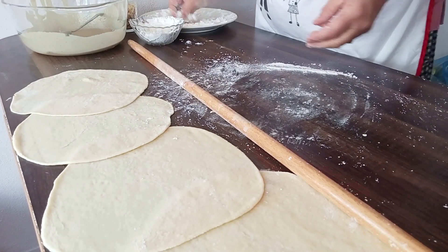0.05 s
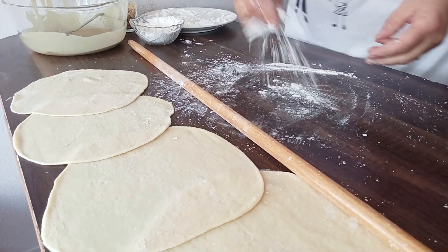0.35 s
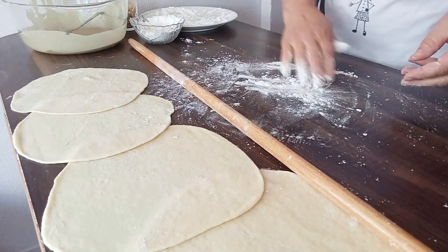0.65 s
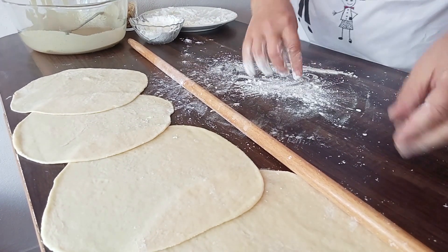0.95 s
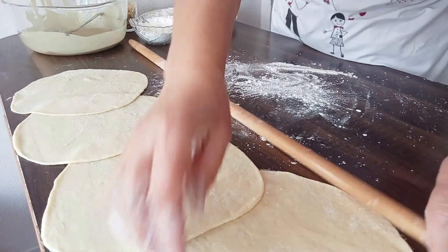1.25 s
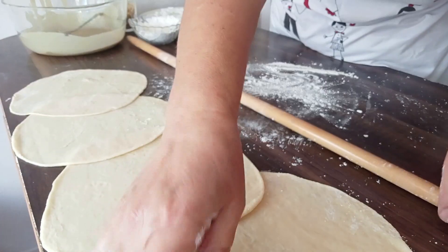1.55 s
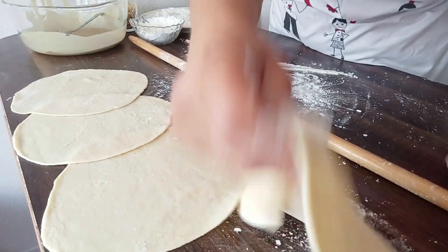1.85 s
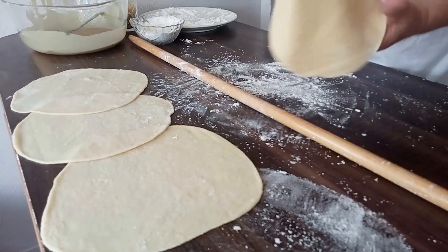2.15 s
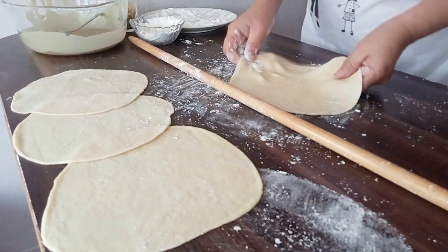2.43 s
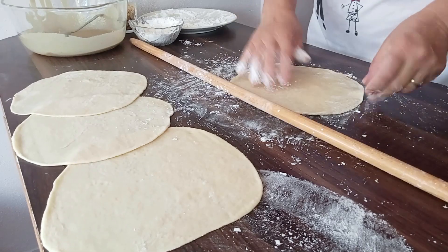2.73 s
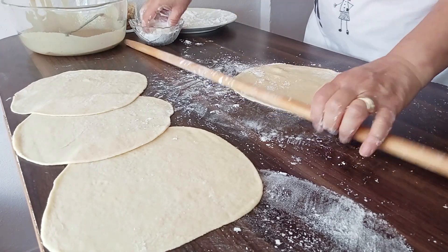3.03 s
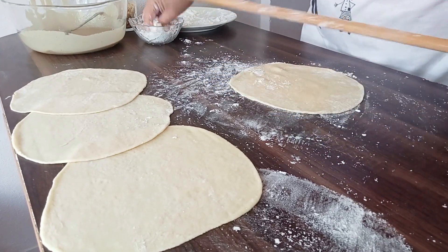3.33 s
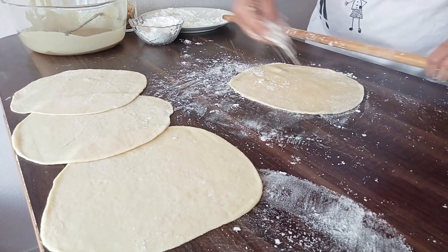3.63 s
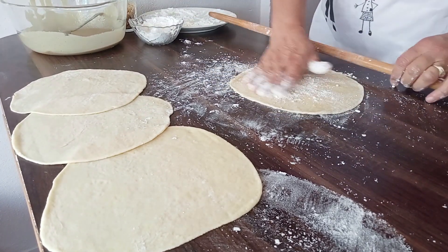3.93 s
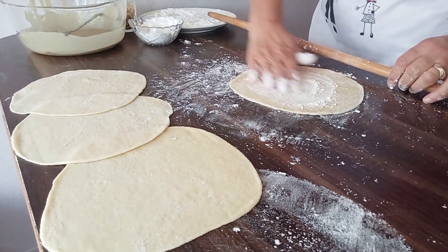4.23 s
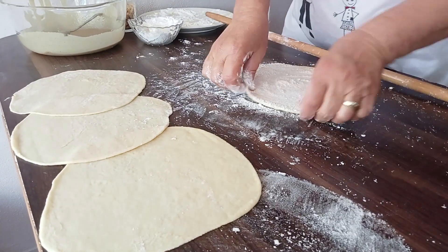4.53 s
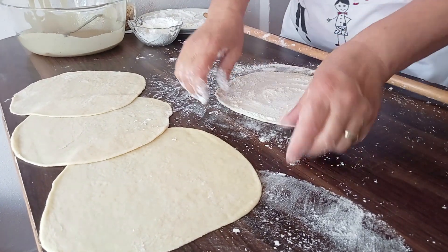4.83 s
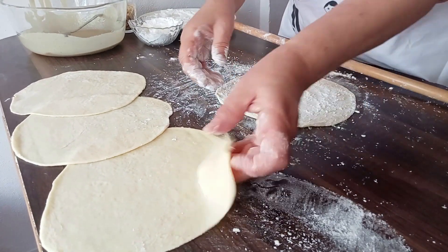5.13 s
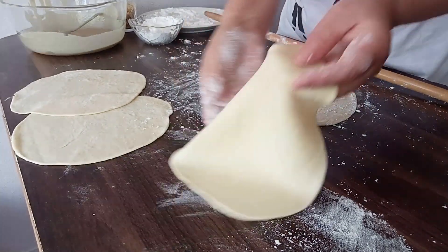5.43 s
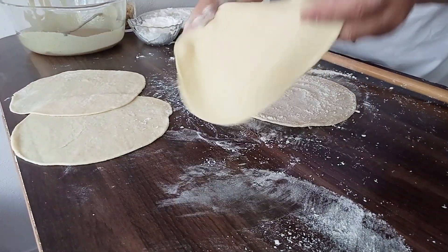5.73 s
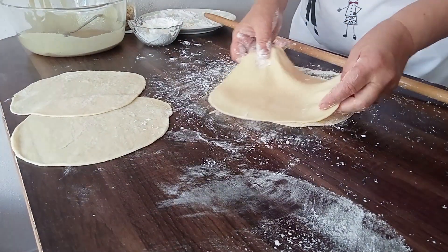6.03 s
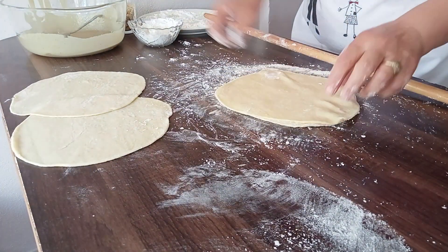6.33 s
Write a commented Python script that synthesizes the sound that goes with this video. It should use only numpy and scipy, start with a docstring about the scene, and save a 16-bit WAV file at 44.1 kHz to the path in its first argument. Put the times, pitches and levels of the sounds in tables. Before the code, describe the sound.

Flour-dusted hands rub and slap dough on a wooden table, and a rolling pin clacks against a glass bowl and a china plate.

```python
"""A small kitchen, close to a floured wooden table where dough is being worked. An appliance hums.
Flour hisses under a palm, dough sticks and slips over the wood, and fingers and slaps of dough
make the boards thud. A thin rolling pin is picked up, clacks on a glass mixing bowl, rolls,
strikes a china plate and is set down. Each hard knock makes the dish ring with its own notes."""
import sys
import numpy as np
from scipy import signal
from scipy.fft import rfft, irfft
from scipy.io import wavfile
from scipy.ndimage import uniform_filter1d

SR = 44100
rng = np.random.default_rng(int(sys.argv[2]) if len(sys.argv) > 2 else 0)


def to_wav(sig):
    """Store sig (one row per channel, or 1-D mono) as 16-bit WAV at the path in sys.argv[1].

    Samples outside -1..1 are clipped; the rate is SR.
    """
    pcm = np.clip(np.atleast_2d(sig), -1, 1) * 32767
    pcm = np.round(pcm).astype(np.int16)
    wavfile.write(sys.argv[1], SR, pcm.T)  # frames by channels


N = 285768
TIME = np.arange(N) / SR  # seconds into the scene
AGE = np.arange(SR // 2) / SR  # seconds since a knock


def undb(db):
    """Turn decibels into a number to multiply by."""
    return 10 ** (np.asarray(db) / 20)


def unit(x):
    """Scale a signal to an average strength (rms) of 1."""
    return x / np.sqrt(np.mean(x ** 2))


def attack(x, size=441):
    """Scale a knock to a strength of 1 over its first 10 ms."""
    return x / np.sqrt(np.mean(x[:size] ** 2))


def add(track, s, sound):
    """Mix a sound into the track, starting at s seconds."""
    start = int(s * SR)
    track[start:start + len(sound)] += sound[:N - start]


def only(x, part, hz, order):
    """Filter a sound down to its "low" part, its "high" part or a "band"."""
    return signal.sosfilt(signal.butter(order, hz, part, fs=SR, output="sos"), x)


def noise(spectrum, size=N):
    """Noise shaped by a table of (pitch [Hz], level [dB])."""
    hz, db = np.transpose(spectrum)
    bins = np.maximum(np.fft.rfftfreq(size, 1 / SR), 1)
    bass_cut = np.minimum(bins / hz[0], 1) ** 2
    shape = undb(np.interp(np.log(bins), np.log(hz), db))
    return unit(irfft(rfft(rng.standard_normal(size)) * bass_cut * shape, size))


def wander(rate):
    """A random curve that heads for a new value `rate` times a second."""
    points = rng.standard_normal(int(N / SR * rate) + 2)
    return unit(np.interp(TIME * rate, np.arange(len(points)), points))


def clicks(per_s):
    """Scattered tiny clicks of uneven size."""
    return rng.standard_normal(N) * (rng.random(N) < per_s / SR)


def stroke(length_s, rise, fall):
    """A speed curve, 0 to 1; rise and fall are the shares of time spent speeding up and slowing."""
    done = np.linspace(0, 1, int(length_s * SR))
    ramp = np.minimum(done / rise, (1 - done) / fall)
    return np.sin(np.pi / 2 * np.clip(ramp, 0, 1))


def fade(t60):
    """Die away by 60 dB in t60 seconds, the ring time."""
    return np.exp(-np.log(1000) * AGE / t60)


def burst(spectrum, t60):
    """Fading noise: many close notes dying together."""
    return attack(noise(spectrum, size=len(AGE)) * fade(t60))


def ring(notes):
    """A struck object's own notes, each starting up or down at random."""
    return attack(sum(rng.choice([-1, 1]) * undb(db) * fade(t60) * np.sin(2 * np.pi * hz * AGE)
                      for hz, db, t60 in notes))


# the appliance's tones: (pitch [Hz], level [dB])
HUM_TONES = [(170, -82.5), (4140, -83), (12415, -85)]
# the room's background noise: (pitch [Hz], level [dB])
ROOM_NOISE = [(25, 1.5), (64, -5), (110, -3), (175, 1.5), (285, -2.5), (405, 1.5), (500, -3.5), (1000, -9),
              (2400, -13), (4200, -14), (5000, -15.5), (8100, -17.5), (10100, -21), (14800, -18.5),
              (16000, -22)]


def kitchen_hum(waver_db=2.0, noise_db=-70):
    """An appliance hums and whines unsteadily over the quiet noise of the room."""
    hum = np.zeros(N)
    for hz, db in HUM_TONES:
        gain = undb(db + waver_db * wander(6.7))
        hum += gain * unit(np.sin(2 * np.pi * hz * TIME + .5 * wander(3)))
    return hum + undb(noise_db + 0.47 * wander(1.5)) * noise(ROOM_NOISE)


# strokes over flour: (start [s], length [s], level [dB], loose flour compared with the stroke [dB])
FLOUR_STROKES = [(.01, 0.3, -65.5, -20), (0.577, 0.045, -67.5, 3), (0.634, 0.098, -61.5, 7.5),
                 (0.769, 0.032, -56.5, 4), (0.79, 0.13, -56.5, 6.5), (1.07, 0.31, -61.5, -18),
                 (1.339, 0.26, -55.5, -10), (1.523, 0.2, -64, -1), (1.708, 0.13, -59.5, 0),
                 (1.8, 0.21, -60.5, -10), (2.072, .14, -60, -17), (2.191, 0.14, -61.5, -12),
                 (2.482, 0.067, -56.5, -6), (2.526, 0.19, -66, -8), (3.074, 0.11, -54, -9),
                 (3.988, .19, -59.5, 0), (4.138, 0.31, -56, 0.5), (4.335, 0.17, -57, 4.5),
                 (4.487, 0.046, -60.5, 4), (4.507, 0.055, -52, 3.5), (4.555, 0.18, -62, -2),
                 (4.69, 0.19, -59, -10), (4.836, 0.081, -59, -6), (4.936, 0.2, -65, -8),
                 (5.065, 0.22, -61, -4), (5.328, 0.34, -56, -4.5), (5.72, 0.35, -63, -9),
                 (6.286, 0.073, -70, -4.5)]
# the hiss of rubbed flour: (pitch [Hz], level [dB])
RUBBED_FLOUR = [(400, -28.5), (1500, -6.5), (3500, 0), (6000, 0.5), (8000, 2), (10500, -9.5), (13000, -1.5),
                (15000, 7), (16000, 2)]
# the airy hiss of loose flour: (pitch [Hz], level [dB])
LOOSE_FLOUR = [(5000, -22.5), (8000, 4), (10500, -10.5), (13000, 2), (15000, 0.5), (16000, 3.5)]


def flour(fidget_db=-75, flicker_db=1.33, grain_db=-6, grains_per_s=1000):
    """Flour hisses under the skin, louder as the hand speeds up, with a sprinkle of coarser grains."""
    power = undb(fidget_db + 3.5 * wander(4.6)) ** 2  # small movements between strokes
    loose_power = np.zeros(N)
    for s, length_s, db, loose_db in FLOUR_STROKES:
        gain = undb(db) * stroke(length_s, rise=.35, fall=0.47)
        add(power, s, gain ** 2)
        add(loose_power, s, (gain * undb(loose_db)) ** 2)
    grains = unit(only(clicks(grains_per_s), "high", 5000, order=2))
    rubbed = np.sqrt(power) * (noise(RUBBED_FLOUR) + undb(grain_db) * grains)
    loose = np.sqrt(loose_power) * noise(LOOSE_FLOUR)
    return (rubbed + loose) * undb(flicker_db * wander(260))


# drags over the wood, plus two long, faint, low murmurs (at 0.549 s and 3.299 s):
# (start [s], length [s], level [dB], highest centre pitch [Hz])
DRAGS_AND_MURMURS = [(0.018, 0.13, -64.5, 1540), (0.549, .46, -70.5, 556), (1.112, 0.35, -73.5, 1270),
                     (1.35, 0.2, -59.5, 640), (1.41, 0.077, -50, 700), (1.521, 0.15, -60, 880),
                     (1.711, 0.24, -69.5, 960), (2.081, .25, -71, 1420), (2.571, .14, -73.5, 1240),
                     (2.737, 0.091, -66, 1560), (3.299, 1, -72.5, 564), (4.2, .27, -73.5, 1170),
                     (4.547, 0.17, -63.5, 735), (4.82, .11, -63, 1000), (5.098, .27, -64.5, 900),
                     (5.338, 0.31, -60.5, 1140), (5.543, 0.062, -56, 1320), (6.319, 0.2, -68, 920)]
# the broad noise under each of them: (pitch [Hz], level [dB])
DRAG_NOISE = [(100, -23), (300, -1), (700, -9.5), (1400, 1), (2200, -5), (4000, -6.5), (8000, -24),
              (16000, -34)]


def drags_and_murmurs(glide_octaves=0.46, width_octaves=.5, rub_db=-5, stick_db=1.8):
    """Dragged dough and skin stick and slip, higher with speed; two faint murmurs swell the same way."""
    slips = clicks(per_s=700)
    band_hz = np.geomspace(300, 2400, 12)
    bands = [unit(only(slips, "band", [hz * .93, hz * 1.07], order=1)) for hz in band_hz]
    bands = np.array([rng.choice([-1, 1]) * band * undb(stick_db * wander(45)) for band in bands])
    rub = undb(rub_db) * noise(DRAG_NOISE)
    out = np.zeros(N)
    for s, length_s, db, centre_hz in DRAGS_AND_MURMURS:
        speed = stroke(length_s, rise=0.32, fall=0.307)
        patch = int(rng.random() * (N - len(speed))) + np.arange(len(speed))  # a random stretch
        octaves_off = np.log2(band_hz / centre_hz)[:, None] + glide_octaves * (1 - speed)
        weights = np.exp(-.5 * (octaves_off / width_octaves) ** 2)
        scrape = np.sum(bands[:, patch] * weights, axis=0)
        add(out, s, undb(db) * speed * (unit(scrape) + rub[patch]))
    return out


# the table top's own notes: (pitch [Hz], level [dB], ring time [s])
TABLE_NOTES = [(128, -17, .25), (212, -5, .2), (255, -5, .18), (345, -3, .17), (420, -6, .11),
               (495, -6, .11), (635, -2, .13), (685, 0, .15), (800, -11, .11), (932, -2, .24),
               (1020, -1, .23), (1100, -6, .2), (1184, -5, .16), (1518, -12, .14), (1830, -6, .13)]
# the short noise of knocked boards: (pitch [Hz], level [dB])
BOARD_NOISE = [(50, -31.5), (100, -19), (200, 4), (400, 2), (900, 2.5), (2000, -3), (6000, -18.5)]


def table_knock(top_hz, spot_db=3):
    """One knock on the table; each spot brings out different notes."""
    notes = [(hz, db + spot_db * rng.standard_normal(), t60) for hz, db, t60 in TABLE_NOTES]
    knock = ring(notes) + undb(3) * burst(BOARD_NOISE, t60=0.046)
    knock = only(knock, "high", 0.13 * top_hz, order=1)  # a small hard touch gives less bass
    return attack(only(knock, "low", top_hz, order=5))  # a soft touch gives less treble


# fingers and knuckles landing: (time [s], level [dB], treble limit [Hz])
THUDS = [(0.106, -45.5, 935), (1.315, -61.5, 493), (1.405, -56.5, 420), (1.5597, -35.5, 1360),
         (1.572, -34.5, 1530), (1.585, -54.5, 1100), (1.728, -53.5, 453), (2.785, -54.5, 324),
         (4.358, -49.5, 1170), (4.555, -58, 580), (4.595, -49.5, 420), (4.609, -55, 960),
         (4.660, -50.5, 1642), (4.673, -58.5, 897), (4.728, -58.5, 1420), (4.841, -57, 1670),
         (5.373, -62, 602)]


def finger_thuds():
    """Soft fingers wake only the table's lower notes, so they sound dull."""
    out = np.zeros(N)
    for s, db, top_hz in THUDS:
        add(out, s, undb(db) * table_knock(top_hz))
    return out


# palm and dough slapping down: (time [s], smack [dB], table thud [dB], crisp edge [dB])
SLAPS = [(1.4368, -30, -38.5, -33.5), (1.4763, -44, -56, -60), (1.776, -51, -54.5, -50.5),
         (2.5, -46, -46, -52), (5.1386, -54, -52.5, -54.5), (5.9252, -40, -47, -59),
         (5.9320, -47, -54.5, -51)]
# the smack of escaping air: (pitch [Hz], level [dB])
SMACK = [(300, -42), (900, 0.5), (1700, 6), (4300, 2.5), (7000, -4), (10000, -13), (16000, -10)]
# the crisp edge of a slap: (pitch [Hz], level [dB])
CRISP = [(2000, -6), (5000, -9), (8000, 11), (10500, -4), (15000, -4)]


def dough_slaps():
    """Trapped air smacks out from under palm and dough while the table thuds."""
    out = np.zeros(N)
    for s, smack_db, thud_db, crisp_db in SLAPS:
        add(out, s, undb(smack_db) * burst(SMACK, t60=0.073))
        add(out, s, undb(thud_db) * table_knock(top_hz=776))
        add(out, s, undb(crisp_db) * burst(CRISP, t60=0.019))
    return out


# light taps, from dough and hands first, then the rolling pin: (time [s], level [dB], treble limit [Hz])
LIGHT_TAPS = [(2.242, -62, 2200), (2.751, -57.5, 2400), (3.021, -56.5, 8000), (3.67, -42, 5900),
              (3.7443, -43.5, 2520)]
# a tap's woody clack: (pitch [Hz], level [dB])
TAP_CLACK = [(100, -28.5), (210, -3), (700, -7), (1200, 0.5), (1600, -2), (2100, -1), (2700, -18.5),
             (3500, 0.5), (5400, -10), (6300, -4.5), (7200, -6.5), (16000, -31)]
# the plate ringing faintly under the pin's tip: (pitch [Hz], level [dB], ring time [s])
PLATE_TAP_NOTES = [(690, -1, .13), (1190, 0, .13), (2150, 0, .16), (3450, -4, .11), (4780, -6, .16),
                   (6300, -6, .13), (8050, -13, .13)]


def light_taps():
    """Light taps land on the table, and plate and table ring briefly."""
    out = np.zeros(N)
    for s, db, top_hz in LIGHT_TAPS:
        clack = burst(TAP_CLACK, t60=0.099)
        tap = clack + undb(-6) * ring(PLATE_TAP_NOTES) + undb(-3.5) * table_knock(top_hz=950)
        add(out, s, undb(db) * attack(only(tap, "low", top_hz, order=2)))
    return out


def dish_hits(hits, notes, crack, crack_t60, tail_db, tail_t60, click_hz):
    """Hard wood on a dish: a click, a short crack, the dish's ring and a tail of many weak notes."""
    dish = ring(notes)
    tail_hz = np.linspace(300, 10000, 110) * rng.uniform(.98, 1.02, 110)
    crack_hz, crack_db = np.transpose(crack)
    tail = ring([(hz, np.interp(hz, crack_hz, crack_db), tail_t60) for hz in tail_hz])
    click = np.sin(2 * np.pi * click_hz * AGE) * fade(0.0053)
    out = np.zeros(N)
    for s, db, ring_db, click_db in hits:
        clack = burst(crack, crack_t60) + undb(tail_db) * tail
        add(out, s, undb(db) * (clack + undb(ring_db) * dish + undb(click_db) * click))
    return out


# the pin's tip on the bowl: (time [s], crack [dB], ring above crack [dB], click above crack [dB])
BOWL_HITS = [(3.043, -24, 2.5, -8), (3.0531, -16, -8.5, 2)]
# the bowl's own notes: (pitch [Hz], level [dB], ring time [s])
BOWL_NOTES = [(1457, -7, .17), (1830, -7, .17), (2045, -7, .13), (2322, -1, .14), (2376, -1, .14),
              (2575, -7, .12), (2725, -5, .12), (3026, -6, .12), (3332, 0, .16), (4206, -2, .14),
              (4410, -6, .16), (5327, -1, .18), (6509, 0, .12), (7359, -16, .14), (7908, -16, .13),
              (9055, -16, .13)]
# the crack of wood on glass: (pitch [Hz], level [dB])
BOWL_CRACK = [(100, -31), (250, -18.5), (600, -17.5), (1000, -14.5), (1450, -4.5), (2400, -8), (3300, 2),
              (4400, -7), (5400, -7), (5950, -15), (6450, 1), (7000, -12), (9000, -17.5), (10500, -26),
              (15000, -23.5)]


def glass_bowl():
    """The pin clacks on the bowl, and the glass rings briefly."""
    return dish_hits(BOWL_HITS, BOWL_NOTES, BOWL_CRACK,
                     crack_t60=0.052, tail_db=-14.5, tail_t60=0.086, click_hz=2650)


def table_jolts():
    """The hardest hit on each dish also jolts the table."""
    out = np.zeros(N)
    add(out, BOWL_HITS[-1][0], undb(-43) * table_knock(top_hz=1201))
    add(out, PLATE_HITS[0][0], undb(-42) * table_knock(top_hz=1000))
    return out


# the pin rolling and sliding: (time [s], rumble [dB], scrape on the plate's rim [dB])
PIN_ROLL = [(3.17, -63, -85), (3.195, -60.5, -90), (3.25, -48, -66), (3.33, -67.5, -63), (3.45, -75, -72.5),
            (3.58, -84.5, -72.5), (3.68, -70.5, -71), (3.9, -74.5, -83)]


def pin_roll():
    """The pin rumbles on the boards, and its sliding tip keeps the plate faintly singing."""
    times, rumble_db, rim_db = np.transpose(PIN_ROLL)
    rumble_gain = undb(np.interp(TIME, times, rumble_db))
    rim_gain = undb(np.interp(TIME, times, rim_db))
    moving = uniform_filter1d(1. * (TIME > times[0]) * (TIME < times[-1]), size=800)  # soft on and off
    rumble = unit(only(clicks(per_s=1000), "band", [220, 480], order=2))
    rubbing = only(clicks(per_s=4000), "band", [3000, 6000], order=2)
    plate = ring(PLATE_NOTES) + 2 * burst(PLATE_CRACK, t60=0.12)
    rim = unit(signal.fftconvolve(rubbing, plate)[:N])
    return moving * (rumble_gain * rumble + rim_gain * rim)


# the pin on the plate: (time [s], crack [dB], ring above crack [dB], click above crack [dB])
PLATE_HITS = [(3.2539, -14.5, -6.5, -3.5), (3.2620, -22, -9, 7.5)]
# the plate's own notes: (pitch [Hz], level [dB], ring time [s])
PLATE_NOTES = [(1120, -13, .2), (2165, -5, .19), (3283, -7, .14), (3353, -4, .16), (3424, -8, .14),
               (4124, -13, .13), (4483, 0, .2), (4596, -8, .15), (4726, -5, .19), (5093, -13, .15),
               (5425, -6, .18), (5782, -12, .12), (7803, -8, .16), (7880, -6, .16), (9710, -15, .12),
               (11835, -12, .12), (13900, -20, .12)]
# the crack of wood on china: (pitch [Hz], level [dB])
PLATE_CRACK = [(100, -27), (300, -10.5), (800, -5), (1170, -5), (1750, -5), (2170, 1.5), (2900, -9),
               (3350, 10.5), (3850, -12.5), (4500, 5.5), (6200, -3.5), (6900, -16.5), (7900, 5),
               (9300, -16.5), (12000, -16), (16000, -29)]


def china_plate():
    """The pin chatters against the plate, and the china rings brightly."""
    return dish_hits(PLATE_HITS, PLATE_NOTES, PLATE_CRACK,
                     crack_t60=0.056, tail_db=-12.0, tail_t60=0.135, click_hz=4360)


def room(x, echo_db=-7, low_t60=0.31, high_t60=0.13, split_hz=900, gap_s=0.0018):
    """Close walls echo almost at once; low sounds linger a little longer."""
    echoes = rng.standard_normal(len(AGE))
    low = only(echoes, "low", split_hz, order=1)
    tail = (low * fade(low_t60) + (echoes - low) * fade(high_t60)) * (AGE > gap_s)
    return x + undb(echo_db) * signal.fftconvolve(x, tail / np.linalg.norm(tail))[:N]


def scene():
    """Everything on the table, heard in the humming kitchen."""
    hands = finger_thuds() + dough_slaps()
    knocks = glass_bowl() + china_plate() + table_jolts() + light_taps()
    rubbing = pin_roll() + flour() + drags_and_murmurs()
    return (room(hands + knocks + rubbing) + kitchen_hum())[None]


def record(dry, bass_hz=115, top_hz=16000):
    """The small microphone loses the bass, and the recorder cuts the highest treble."""
    thin = only(dry, "high", bass_hz, order=3)
    return signal.sosfilt(signal.ellip(10, .2, 80, top_hz, fs=SR, output="sos"), thin)


dry = scene()
out = record(dry)
to_wav(out)
```